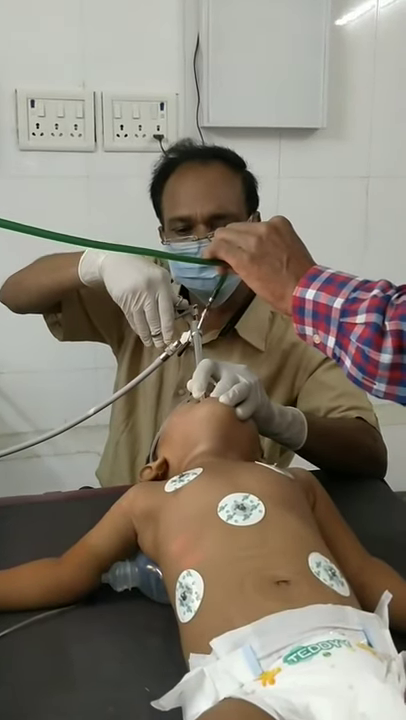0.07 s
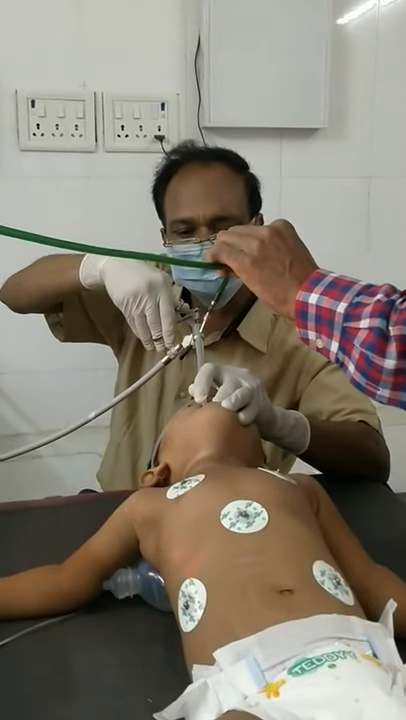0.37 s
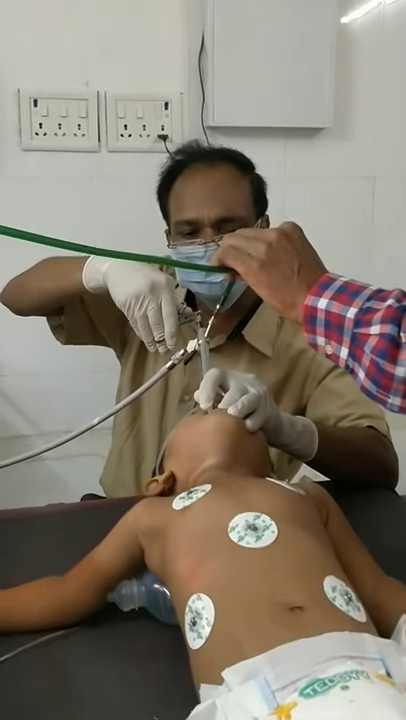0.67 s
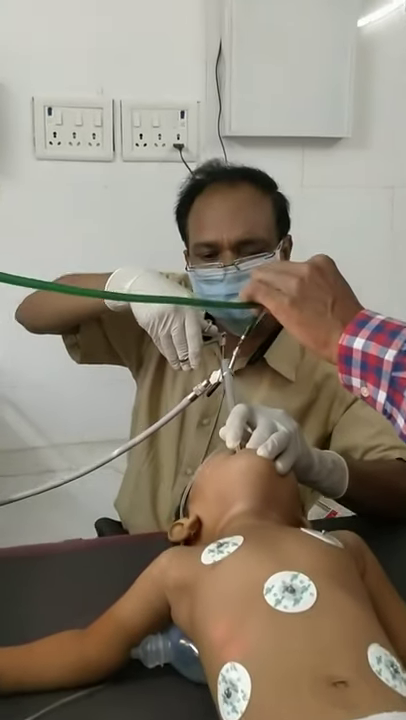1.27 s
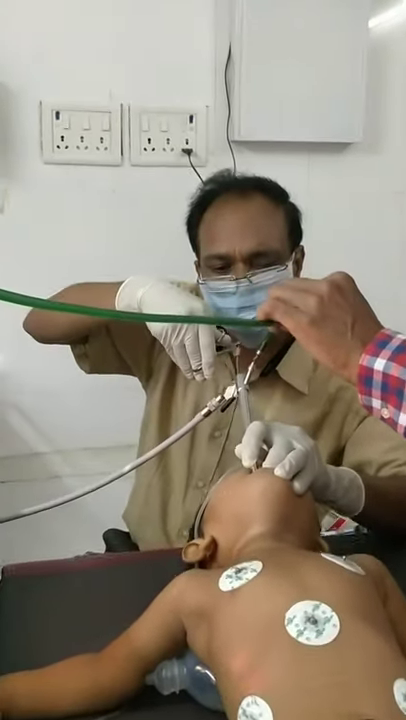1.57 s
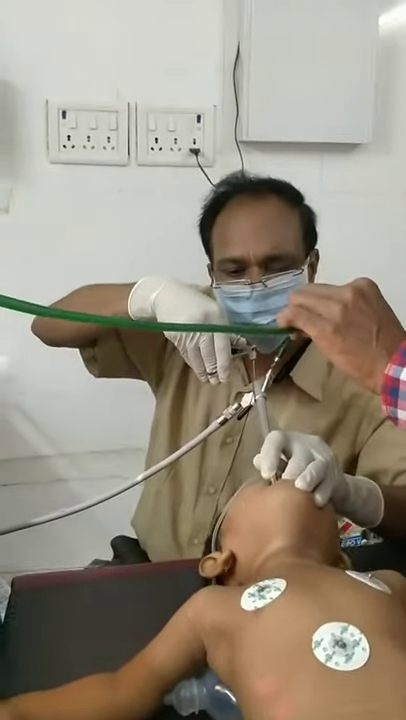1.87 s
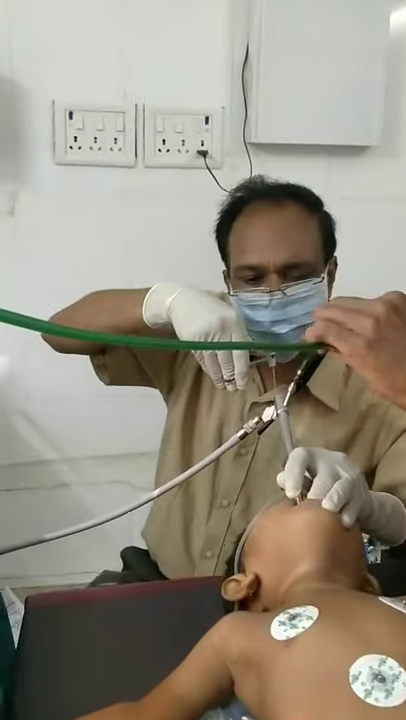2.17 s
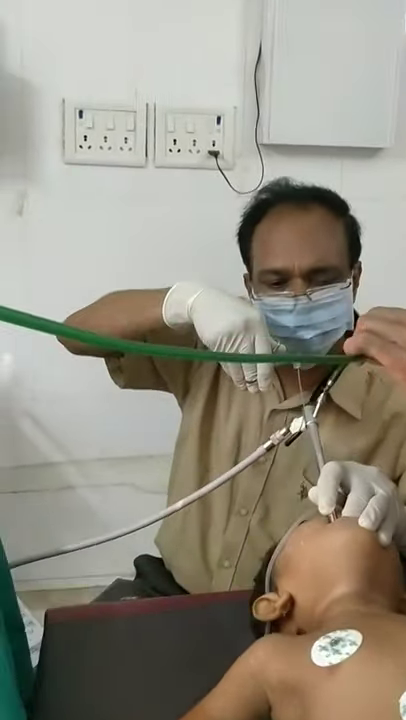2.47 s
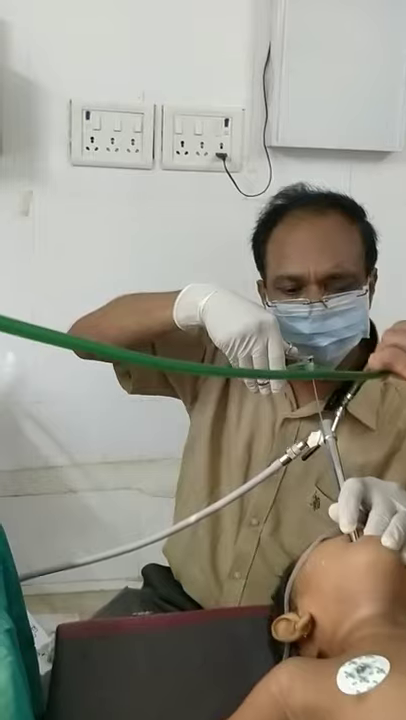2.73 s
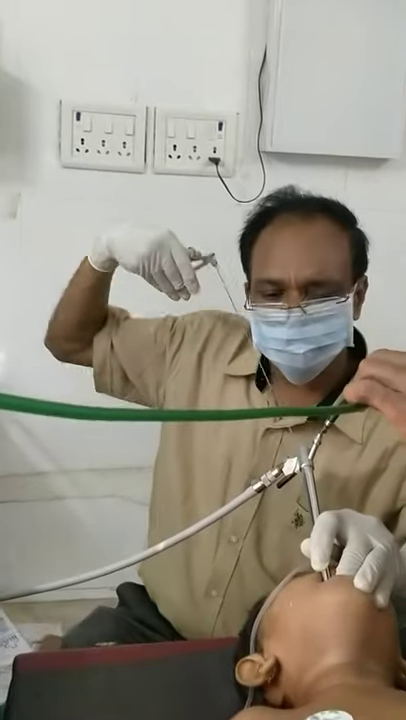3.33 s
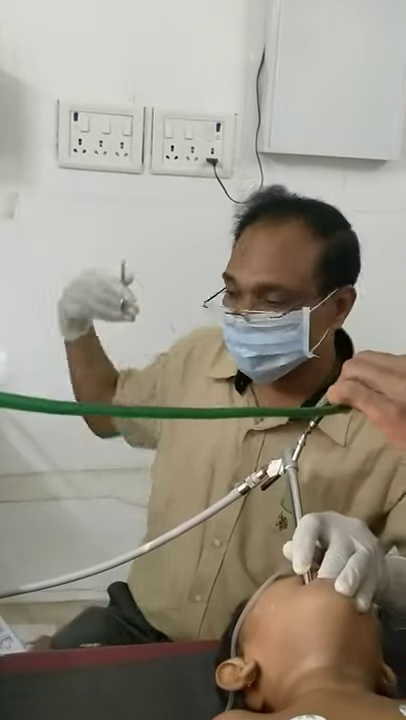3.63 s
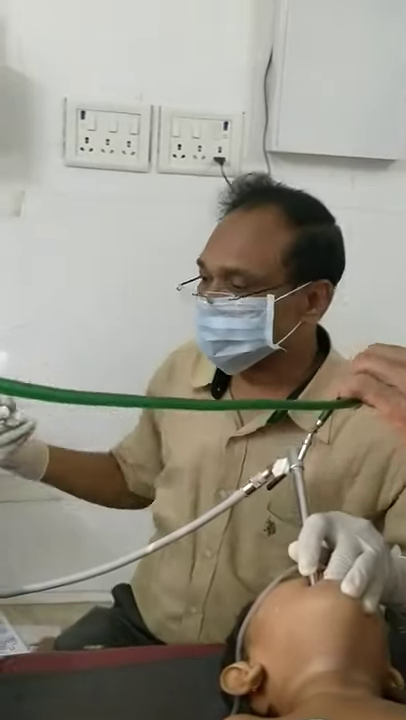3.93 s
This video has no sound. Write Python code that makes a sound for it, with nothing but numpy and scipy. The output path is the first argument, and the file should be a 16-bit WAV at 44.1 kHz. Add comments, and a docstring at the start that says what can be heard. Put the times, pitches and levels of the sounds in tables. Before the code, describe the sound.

Gas hisses in four bursts, each ending in a click, over a motor hum.

```python
"""A burst of gas hisses from a hand-worked ventilation line in a small clinical room, about once a second.
Each burst of turbulent noise swells, holds and dies away, and a spit of gas clicks as the valve shuts.
A faint leak hisses throughout. Behind it a motor hums at harmonics of its shaft rate, over the rush of
room air. The right microphone hears little treble."""
import sys
import numpy as np
from scipy import signal
from scipy.fft import rfft, irfft, next_fast_len
from scipy.io import wavfile
from scipy.ndimage import uniform_filter1d, map_coordinates

SR = 44100
rng = np.random.default_rng(int(sys.argv[2]) if len(sys.argv) > 2 else 0)


def store_pcm(level_fs):
    """Save levels as 16-bit WAV."""
    pcm = np.round(np.clip(level_fs, -1, 1) * 32767).astype(np.int16)
    wavfile.write(sys.argv[1], SR, np.atleast_2d(pcm).T)


N = 176400


def amp(db):
    """Amplitude ratio of a level in decibels."""
    return 10 ** (np.asarray(db) / 20)


def unit(x):
    """Normalisation to rms 1."""
    return x / np.sqrt(np.mean(x ** 2) + 1e-20)


def along(points, hz):
    """Interpolation of (f/Hz, value) points on a logarithmic frequency axis."""
    f, v = np.transpose(points)
    return np.interp(np.log(hz + 1), np.log(f + 1), v)


def wobble(rate):
    """Smooth random modulation: a spline through `rate` Gaussian knots a second."""
    knots = rng.standard_normal(int(N * rate / SR) + 4)
    return map_coordinates(knots, [np.arange(N) * rate / SR])


def filtered(x, response):
    """Linear filtering: the spectrum of x times a frequency response."""
    size = next_fast_len(N + SR // 4)
    return irfft(rfft(x, size) * response(np.fft.rfftfreq(size, 1 / SR)), size)[..., :N]


def rush(spectrum):
    """Partially coherent stereo noise of rms 1: near mono in the bass, unrelated in the treble."""
    # likeness of left and right: f/Hz, coherence
    coherence = [(60, .94), (130, .99), (290, .78), (640, .68), (1400, .25), (3100, .06), (7000, 0),
                 (15000, 0)]

    def mid_side_gains(hz):
        angle = np.arccos(np.clip(along(coherence, hz), -1, 1)) / 2
        return amp(along(spectrum, hz)) * [np.cos(angle), np.sin(angle)]

    mid, side = filtered(rng.standard_normal((2, N)), mid_side_gains)
    return unit(np.array([mid + side, mid - side]))


def flicker(x, depth_db):
    """Random modulation in time and frequency: small patches of the spectrum come and go."""
    frames = signal.stft(x, nperseg=1024)[2]
    patches = uniform_filter1d(rng.standard_normal(frames.shape[1:]), 4, axis=0)
    patches = uniform_filter1d(patches, 9, axis=1)
    return signal.istft(frames * amp(depth_db * unit(patches)), nperseg=1024)[1][:, :N]


def near_walls(x, strength, count=8):
    """Comb filtering: weak echoes off couch and walls interfere, differently on each side; rms 1."""
    delays_s = rng.uniform(.002, .012, (count, 2, 1))
    comb = lambda hz: 1 + strength * sum(np.exp(-2j * np.pi * hz * delay) for delay in delays_s)
    return unit(filtered(x, comb))


def gas_jet(rise_s=0.12, swell_db_per_s=10, fall_db_per_s=105, body_hz=9000):
    """Turbulent jet noise, coloured by tube resonances, follows the flow through the valve."""
    # valve strokes: opening t/s, start of closing t/s, level then/dB, extra level below body_hz/dB
    bursts = [(-0.07, 0.437, -23.5, -1), (0.988, 1.459, -20, -1), (2.021, 2.495, -21.5, 1),
              (3.059, 3.542, -20.5, 1.35)]
    # jet spectrum: f/Hz, relative level/dB
    spectrum = [(150, -41), (450, -1.5), (750, -14), (1100, -17), (1700, -17.5), (2400, -17.5), (3200, -16),
                (4500, -15), (5600, -11), (6500, -15), (7700, -13.5), (8300, -16.5), (9000, -23.5),
                (9900, -16), (10300, -7), (11600, -5.5), (13500, -0.5), (15300, 2.5), (16000, -2.5)]
    # tube resonances: f/Hz, width/Hz, lift/dB
    resonances = [(2350, 240, 2.5), (2900, 280, 3.5), (3480, 230, 7), (4100, 260, 6), (4600, 200, 5.5),
                  (5100, 140, 3), (6570, 220, 3), (7130, 220, 4), (7760, 160, 3.5)]
    t, gas = np.arange(N) / SR, np.zeros((2, N))
    tubing = lambda hz: amp(sum(db / (1 + (2 * (hz - f) / width) ** 2) for f, width, db in resonances))
    hiss = flicker(filtered(rush(spectrum), tubing), depth_db=2.1)
    hiss = near_walls(hiss, strength=0.24)
    body = filtered(hiss, lambda hz: 1 / (1 + (hz / body_hz) ** 8))
    for opens, closes, db, body_db in bursts:
        opening = np.clip((t - opens) / rise_s, 0, 1)
        swell_db = -swell_db_per_s * np.maximum(closes - t, 0)
        fall_db = -fall_db_per_s * np.maximum(t - closes, 0)
        flow = opening * amp(db + swell_db + fall_db)
        gas += flow * (hiss + (amp(body_db) - 1) * body)
    flutter_db = .5 * wobble(60) + .3 * wobble(14)
    return gas * amp(flutter_db)


def leak(level_db=-47):
    """Steady turbulence at a leak gives a thin, even hiss."""
    # leak spectrum: f/Hz, relative level/dB
    spectrum = [(1000, -5), (2500, 0.5), (4000, -2), (4600, -3), (4900, 3), (5500, -0.5), (6300, -3),
                (6800, -18), (7500, -7.5), (9700, -11), (10300, -8), (11500, -4), (12600, 1), (14000, 5),
                (15300, -1), (16000, -13)]
    return amp(level_db) * near_walls(rush(spectrum), strength=.12)


def motor(turns, level_db=-29, blur_rad=0.018, spread_rad=0.055):
    """Shaft harmonics add nearly in phase once a turn; higher ones stray more and differ between ears."""
    # harmonics: multiple of the shaft rate, relative level/dB
    harmonics = [(1, -16.5), (2, -16.5), (3, -8), (4, -0.5), (5, -14), (6, -22.5), (7, -17), (8, -14.5),
                 (9, -28.5), (10, -29), (11, -31), (12, -30), (13, -19.5), (14, -19), (15, -34),
                 (16, -29.5), (17, -35.5), (18, -42.5), (19, -30), (20, -37.5), (21, -35.5), (22, -50.5),
                 (23, -44), (24, -31), (25, -42), (26, -29.5)]
    # three harmonics that grow louder midway: multiple of the shaft rate -> growth/dB
    growth_db = {1: 4.3, 5: 4.7, 14: 6}
    growth_at_s, growth_time_s = 1.88, 0.15
    growth = np.tanh((np.arange(N) / SR - growth_at_s) / growth_time_s) / 2
    hum = np.zeros((2, N))
    for order, db in harmonics:
        scatter = .16 * order * rng.standard_normal()
        phase = 2 * np.pi * order * turns + scatter + blur_rad * order * wobble(7)
        ear_offset = min(spread_rad * order / 2, .7) * rng.choice([-1, 1])
        waver_db = .9 * wobble(7)
        rms = amp(db + growth_db.get(round(order), 0) * growth + waver_db)
        hum += np.sqrt(2) * rms * np.sin(phase + np.array([[ear_offset], [-ear_offset]]))
    return amp(level_db) * hum


def fan(hz=366.7, level_db=-52):
    """A second machine's fan adds a faint tone with random phase modulation."""
    phase = 2 * np.pi * hz * np.arange(N) / SR + 1.2 * wobble(3.92)
    return amp(level_db) * np.sqrt(2) * np.sin(phase)


def room_air(turns, level_db=-36.5, throb_depth=0.1):
    """Amplitude modulation: the rush of air throbs a little with each turn of the motor."""
    # airflow spectrum: f/Hz, relative level/dB
    spectrum = [(20, 2), (35, -28), (60, -4), (85, -0.5), (122, 5), (160, 2.5), (220, 1.5), (300, -1),
                (370, -4), (430, -3), (550, 1.5), (660, -4), (740, -6.5), (850, -13.5), (1100, -15),
                (1500, -21), (1650, -14), (1800, -21.5), (2400, -28), (4000, -86), (8000, -66)]
    return amp(level_db) * (1 + throb_depth * np.cos(2 * np.pi * turns)) * rush(spectrum)


def valve_spits(rise_s=0.0027, hold_s=0.0026, fall_s=0.0076, room_db=-10):
    """A noise transient: gas squeezes through the closing valve's last gap and is heard as a click."""
    # closing spits: t/s, level/dB
    spits = [(0.544, -23.5), (1.581, -21.5), (2.618, -22), (3.655, -22)]
    # spit spectrum: f/Hz, relative level/dB
    spectrum = [(800, -11), (2000, -12), (3300, -5.5), (5000, -5.5), (7500, -8), (9000, -8.5), (10500, 0.5),
                (13500, 8), (15300, 11), (16000, -1.5)]
    t, flow = np.arange(N) / SR, np.zeros(N)
    for centre_s, db in spits:
        before_s = np.maximum(centre_s - hold_s / 2 - t, 0)
        after_s = np.maximum(t - centre_s - hold_s / 2, 0)
        flow += amp(db) * np.exp(-before_s / rise_s - after_s / fall_s)
    clicks = flow * rush(spectrum)
    return clicks + amp(room_db) * room_tail(clicks)


def room_tail(x, t60_s=.35):
    """Reverberation: the diffuse field of the tiled room decays exponentially."""
    t = np.arange(SR // 2) / SR
    tail = rng.standard_normal((2, len(t))) * amp(-60 * t / t60_s)
    return signal.fftconvolve(x, tail / np.linalg.norm(tail[0]), axes=1)[:, :N]


def scene(shaft_hz=48.35, drift=0.001507):
    """Superposition of the gas close by and the motor, fan and air behind it."""
    turns = np.cumsum(shaft_hz * (1 + drift * wobble(2.025))) / SR
    return gas_jet() + valve_spits() + leak() + motor(turns) + fan() + room_air(turns)


def record(dry, top_hz=15650):
    """Frequency response: the right microphone is dull, and both sides are band-limited."""
    # response of the right microphone: f/Hz, gain/dB
    right_response = [(1000, 0), (2500, -1), (5400, -2), (5800, -14), (6100, -25), (6500, 1), (7600, -24),
                      (8100, -14), (9800, -8), (11000, -23), (13000, -21.5), (15000, -28)]
    gains = lambda hz: np.array([np.ones_like(hz), amp(along(right_response, hz))])
    return filtered(dry, lambda hz: gains(hz) * (hz < top_hz))


dry = scene()
out = record(dry)
store_pcm(out)
```